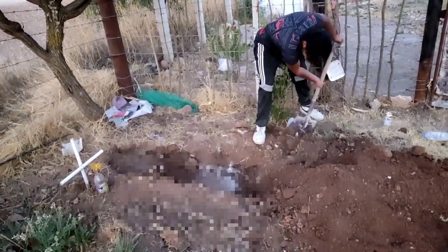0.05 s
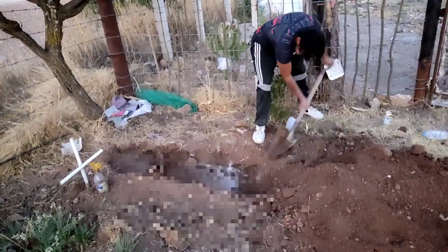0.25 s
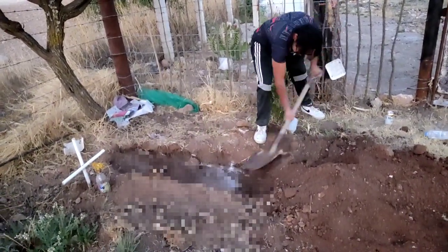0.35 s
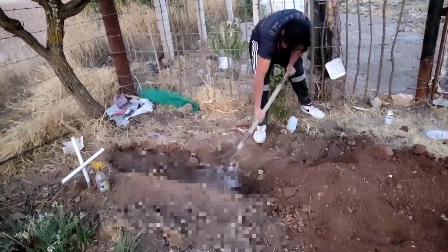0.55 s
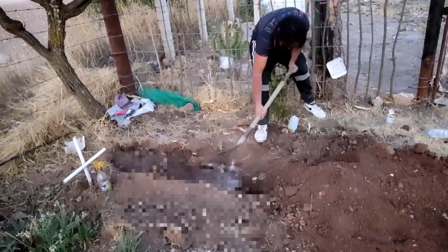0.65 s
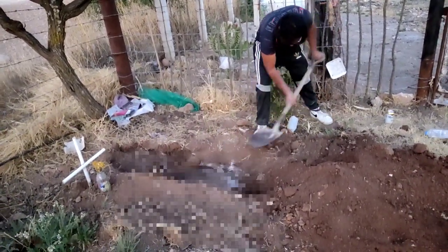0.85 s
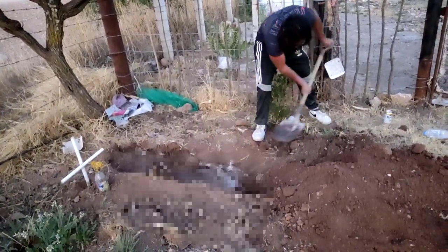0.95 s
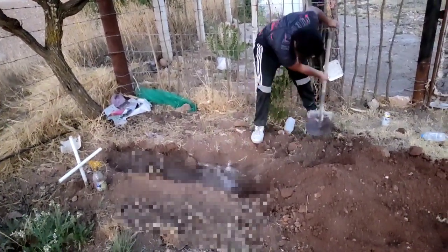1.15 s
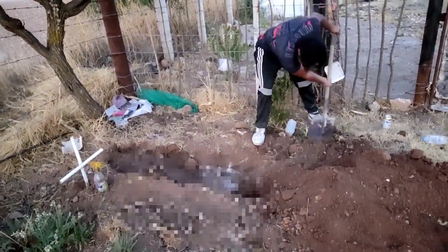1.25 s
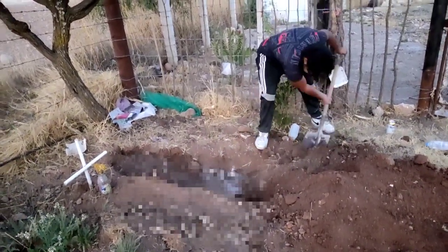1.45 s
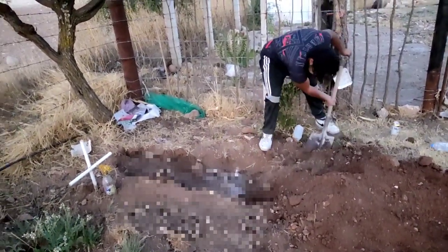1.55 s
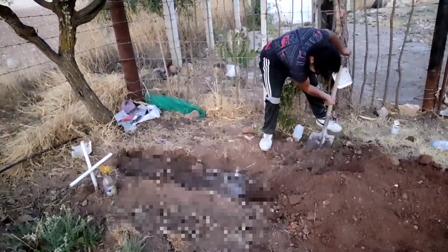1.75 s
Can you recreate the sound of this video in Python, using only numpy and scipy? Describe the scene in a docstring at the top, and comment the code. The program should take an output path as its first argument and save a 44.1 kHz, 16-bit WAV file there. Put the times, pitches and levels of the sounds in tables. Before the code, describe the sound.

Outdoors, a few metres away, dry soil and stones rush off a metal shovel with a bright clank, sparse crumbs fall, a pause, then a duller gritty stab into earth; faint hush and low wind puffs on a stereo phone.

```python
"""Outdoors, a few metres from a steel shovel: stony soil slides off the blade as it is thrown, patters down,
then the blade bites into the heap again with a thud. Grit is grainy noise that hisses and sings high steel modes;
stones and the stab are short noise bursts that also ring the blade. Low noise with single puffs buffets the two
microphone ports of a phone, each with its own colour, over a faint country hush of coloured noise."""
import sys
import numpy as np
from scipy import signal
from scipy.fft import rfft, irfft
from scipy.io import wavfile
from scipy.ndimage import uniform_filter1d, map_coordinates

SR = 44100
rng = np.random.default_rng(int(sys.argv[2]) if len(sys.argv) > 2 else 0)


def to_wav(s):
    """Save 16-bit WAV."""
    ch = np.atleast_2d(s).T  # columns
    pcm = np.round(np.clip(ch, -1, 1) * 32767)  # PCM
    wavfile.write(sys.argv[1], SR, pcm.astype(np.int16))


N = 77175
T = np.arange(N) / SR  # seconds
SIDE = np.array([[.5], [-.5]])  # splits a left minus right difference between the two ports
FILTER_SIZE = 2 ** 13  # samples


def undb(db):
    """Decibels to amplitude."""
    return 10 ** (np.asarray(db) / 20)


def unit(x):
    """Scale to an RMS of one."""
    return x / np.sqrt(np.mean(x ** 2))


def curve(table):
    """Columns of a table joined by straight lines in time."""
    rows = np.array(table, float)
    return [np.interp(T, rows[:, 0], column) for column in rows[:, 1:].T]


def along(table, hz):
    """A (Hz, value) table read on a log-frequency axis."""
    rows = np.array(table, float)
    return np.interp(np.log(hz + 1), np.log(rows[:, 0] + 1), rows[:, 1])


def decay(age, t60):
    """Exponential fade that falls 60 dB in t60 seconds."""
    return 1000. ** (-age / t60)


def convolve(x, response):
    """Pass each row of x through one impulse response."""
    return signal.fftconvolve(x, response, axes=1)[:, :N]


def colour(x, gain_db):
    """Causal minimum-phase filter from a dB curve, built by folding its cepstrum."""
    db = gain_db(np.fft.rfftfreq(FILTER_SIZE, 1 / SR))
    cepstrum = irfft(db * np.log(10) / 20)
    cepstrum[1:FILTER_SIZE // 2] *= 2
    cepstrum[FILTER_SIZE // 2 + 1:] = 0
    return convolve(x, irfft(np.exp(rfft(cepstrum)))[None])


def shape(x, table):
    """Colour by a spectrum that falls away steeply outside its ends, at unit gain for noise."""
    low, high = table[0][0], table[-1][0]

    def gain_db(hz):
        below = 70 * np.log10(np.maximum(low / (hz + 1), 1))
        above = 40 * (hz > high)
        return along(table, hz) - below - above

    hz = np.fft.rfftfreq(FILTER_SIZE, 1 / SR)
    return colour(x, gain_db) / np.sqrt(np.mean(undb(gain_db(hz)) ** 2))


# Colour difference between the ports: peaks and dips. Each row: frequency in Hz, left minus right in dB.
PORT_COLOUR = [(200, -1.5), (700, -0.5), (1270, 2), (2340, 9.5), (4310, -1), (6500, -1), (8000, -2.5),
               (9000, -7.5), (10300, 11.5), (12000, 9.5), (14600, 11)]
# Delay of the right port. Each row: time in seconds, lag in seconds.
PORT_LAG = [(0, 0.000086), (.5, 0.000033), (.8, 0.0000091), (1.3, .00012), (1.75, 0.000099)]
# How unlike the two ports sound. Each row: frequency in Hz, share of the power that they do not have in common.
PORT_APART = [(200, .15), (800, .15), (2000, .3), (6000, .4), (14000, .55)]


def ports(streams):
    """Two spaced ports hear a shared stream plus one each, the right a little late, each with its colour."""
    shared = colour(streams[:1], lambda hz: 10 * np.log10(1 - along(PORT_APART, hz)))[0]
    left, right = shared + colour(streams[1:], lambda hz: 10 * np.log10(along(PORT_APART, hz)))
    right = map_coordinates(right, [(T - curve(PORT_LAG)[0]) * SR], mode="mirror")
    return np.vstack([colour(left[None], lambda hz: along(PORT_COLOUR, hz) / 2),
                      colour(right[None], lambda hz: -along(PORT_COLOUR, hz) / 2)])


# Spectrum of the country hush. Each row: frequency in Hz, density in dB per Hz (relative).
HUSH_COLOUR = [(120, -46.5), (200, -27), (344, -13.5), (397, -15), (833, -24), (963, -28), (2020, -29),
               (2250, -26.5), (3290, -31), (3800, -29.5), (10600, -35), (15000, -42)]
# Level of the hush over time. Each row: time in seconds, level in dB above HUSH_DB.
HUSH_LEVEL = [(0, 12.5), (.35, 4), (.55, -0.5), (.72, 1), (.82, 4.5), (1.1, 4), (1.3, 3.5), (1.75, 6)]
HUSH_DB = -61.5


def country_hush():
    """Faint noise, mostly low mids, whose level sinks and partly returns."""
    air = ports(shape(rng.standard_normal((3, N)), HUSH_COLOUR))
    return undb(HUSH_DB + curve(HUSH_LEVEL)[0]) * air


BUFFET_DB, BUFFETS_PER_S = 3.5, 20


def buffeting():
    """Random wind levels, each held for one buffet and slewed into the next; spread near 1."""
    hold = int(SR / BUFFETS_PER_S)
    steps = np.repeat(rng.standard_normal(N), hold)[:N]
    return unit(uniform_filter1d(steps, hold))


# Wind on the ports. Each row: time in seconds, level in dB, left minus right in dB (held within 14 either way).
WIND_LEVEL = [(0.0, -33, 13.5), (0.048, -37, 11.5), (0.082, -33, 14), (0.12, -32, 19), (0.146, -45, -1),
              (0.198, -44, 1), (0.272, -52, -24), (0.438, -51, 0), (0.496, -34, -17), (0.53, -45, -3),
              (0.598, -35, -25), (0.628, -51.5, -17), (0.73, -45.5, -1), (0.77, -47, -7), (0.944, -55, 4),
              (1.008, -49.5, 7), (1.038, -51, -6.5), (1.194, -53, 9.5), (1.218, -49.5, 3), (1.306, -56, -4),
              (1.33, -49.5, 9), (1.466, -52, -6), (1.516, -39, 13), (1.646, -37.5, 11.5), (1.706, -40, 7),
              (1.75, -41.5, -28)]
# Spectrum of the wind. Each row: frequency in Hz, density in dB per Hz (relative).
WIND_COLOUR = [(12, -12), (20, 8.5), (91, 1), (134, -5.5), (240, -13.5), (544, -44.5), (700, -37),
               (910, -70), (1540, -120)]
# Single puffs. Each row: centre in seconds, peak in dB, port (0 left, 1 right), length in seconds
# (the crests lie a quarter of it either side of the centre), 1 pulls then pushes or -1 the reverse.
PUFFS = [(.04, -24, 0, .009, 1), (0.1155, -19, 0, 0.013, 1), (.5035, -21.5, 1, 0.0051, -1),
         (1.525, -32, 0, 0.0078, 1)]


def wind():
    """Turbulence at each port makes unrelated low buffeting, with a few single pressure puffs."""
    level_db, pan_db = curve(WIND_LEVEL)
    gusts = np.array([buffeting(), buffeting()])
    out = shape(rng.standard_normal((2, N)), WIND_COLOUR) * unit(undb(BUFFET_DB * gusts))
    out = out * undb(level_db + SIDE * np.clip(pan_db, -14, 14))
    for centre, peak_db, port, length, way in PUFFS:
        u = (T - centre) / length * 4
        out[port] += way * undb(peak_db) * u * np.exp(.5 - u ** 2 / 2)
    return out


GRAIN_S, GRAIN_DB = .0004, 1.2  # one grain's hold time; dB per unit of its random size
CLODS_PER_S, CLOD_DB, CRUNCH_S = 140, 5, .004  # crunch power dies by 1/e in CRUNCH_S


def grains():
    """Three streams of grit (one shared, one for each port): uneven grains, clods that crunch and die away."""
    hold = int(GRAIN_S * SR)
    sizes = np.repeat(rng.exponential(1, N).clip(0, 4), hold)[:N]
    clods = (rng.random(N) < CLODS_PER_S / SR) * rng.random(N) * undb(CLOD_DB) ** 2
    crunch = signal.lfilter([1], [1, -np.exp(-1 / (CRUNCH_S * SR))], clods)
    return unit(undb(GRAIN_DB * sizes) * np.sqrt(1 + crunch)) * rng.standard_normal((3, N))


PAIR_SPLIT = .005  # largest gap within a pair, as a share of its frequency


def modes(table, damp, weight=lambda hz: 1):
    """Ring of a set of modes, each a beating pair; shorter when soil holds the steel; unit gain for noise."""
    ring, t = 0, T[:SR // 2]
    for hz, db, t60 in table:
        pair = hz * (1 + PAIR_SPLIT * (rng.random() - .5) * np.array([[0], [2]]))
        beating = np.sin(2 * np.pi * pair * t).sum(axis=0)
        ring = ring + weight(hz) * undb(db) * beating * decay(t, t60 * damp)
    return ring[None] / np.sqrt(np.sum(ring ** 2))


# Main modes of the steel blade. Each row: frequency in Hz, level in dB, free t60 in seconds.
BLADE_MODES = [(1152, -9, .3), (1400, -9, .08), (1453, 0, .42), (1500, -1, .14), (1650, -7, .07),
               (1960, 0, .1), (2150, -5, .08), (2270, -4, .1), (2400, -4, .07), (2540, -5, .09),
               (2745, -3, .12), (2853, -5, .14), (3095, -2, .08), (3354, -1, .14), (3550, -2, .09),
               (3860, -5, .07), (4050, -4, .12), (4194, -4, .1), (4404, -5, .1), (4613, -5, .08),
               (4980, -5, .08), (5400, -7, .07)]


def blade(x, damp, centre_hz, octaves):
    """The steel blade rings at the modes favoured by where it is struck."""
    def place(hz):
        return np.exp(-(np.log2(hz / centre_hz) / octaves) ** 2 / 2)

    return convolve(x, modes(BLADE_MODES, damp, place))


# High modes of the blade. Each row: frequency in Hz, level in dB, free t60 in seconds.
SHEEN_MODES = [(6240, -10, .06), (7810, -10, .05), (8300, -7, .06), (8650, -4, .08), (8780, -3, .07),
               (8990, -4, .07), (9320, 0, .08), (10070, -4, .07), (10370, -3, .07), (10600, -5, .07),
               (10850, -4, .07), (11700, -4, .05)]


def sheen(soil, damp):
    """Grit and knocks excite the high modes of the blade into a bright sheen."""
    return convolve(soil, modes(SHEEN_MODES, damp))


# Stones and clods striking, and the blade stabbing the heap near 1.29 s. Each row: start in seconds,
# level in dB (nominal peak), share that rings the blade in dB, left minus right in dB, t60 in seconds,
# rise time constant in seconds.
KNOCKS = [(0.0714, -29, -13, 3, 0.056, 0.0014), (0.206, -18.5, -18, -4.5, 0.06, 0.0026),
          (0.2228, -16.5, -23, 10, 0.033, .002), (0.2569, -6, -4.5, -0.5, 0.04, 0.00036),
          (0.305, -9.5, -4.5, -5, 0.029, 0.0021), (0.325, -5, -15, -7.5, 0.045, 0.0022),
          (0.3446, -9, -18.5, 0, 0.033, .001), (.478, -36.5, -18, 13, .05, .004),
          (0.517, -27.5, -12.5, 0, 0.1, 0.0021), (0.6045, -25.5, -30, 12, 0.011, 0.00043),
          (0.622, -18.5, -21, -0.5, 0.057, 0.0013), (0.6522, -25.5, -8, -5, 0.075, 0.00049),
          (0.668, -22, -9.5, 1, 0.053, 0.0011), (0.6885, -29, -26, 7, 0.1, 0.00081),
          (1.291, -15, -6, 0, 0.082, 0.0057), (1.3, -22, 4, 0, 0.039, 0.0023),
          (1.3599, -9, -20.5, 2, 0.097, 0.00054), (1.4249, -8, -36, 2.5, 0.055, 0.0018),
          (1.456, -14, -20, 6, 0.042, 0.0017), (1.465, -14, -17, 1, .02, .002),
          (1.48, -29, -25, -7, .02, 0.00056), (1.5, -29, -28, -6, 0.014, 0.00067)]
CRACK_DB, CRACK_S = 0, .003  # opening crack over the body of the knock, and its time constant


def knocks(start, end):
    """Power of the knocks at each port and into the blade: a quick rise, a short crack, a longer fade."""
    hits, ring = np.zeros((2, N)), np.zeros(N)
    for s, peak_db, share_db, pan_db, t60, rise in KNOCKS:
        if start <= s < end:
            age = np.maximum(T - s, 0)
            crack = 1 + undb(CRACK_DB) * np.exp(-age / CRACK_S)
            envelope = (1 - np.exp(-age / rise)) * decay(age, t60) * crack
            power = (undb(peak_db) / 2 * envelope) ** 2
            hits += power * undb(SIDE * pan_db) ** 2
            ring += power * undb(share_db) ** 2
    return hits, ring


def move(slide, grit, strike):
    """One move of the shovel: sliding grit and knocks hiss and ring the blade."""
    start, end = slide[0][0], slide[-1][0]
    damp, centre_hz, octaves, sheen_db = strike
    level_db, pan_db, share_db = curve(slide)
    # soft edges to the move
    on = uniform_filter1d(1. * (T >= start) * (T <= end), size=400, mode="nearest").clip(0)
    # powers, so that grit and knocks add
    hiss = on * undb(level_db + SIDE * pan_db) ** 2 + 1e-12
    hits, hit_ring = knocks(start, end)
    ring = on * undb(level_db + share_db) ** 2 + hit_ring

    sliding = grains() * np.sqrt(hiss.mean(axis=0))
    striking = rng.standard_normal((3, N)) * np.sqrt(hits.mean(axis=0))
    soil = sliding + striking
    pan = np.sqrt((hiss + hits) / np.mean(hiss + hits, axis=0))
    steel = blade(grains() * np.sqrt(ring), damp, centre_hz, octaves)
    bright_soil = shape(soil, grit) + undb(sheen_db) * sheen(soil, damp)
    heard = ports(bright_soil) * pan + ports(steel)
    # roll off below the lowest frequency of the grit
    return signal.sosfilt(signal.butter(4, grit[0][0], "high", fs=SR, output="sos"), heard)


# Sliding soil, one list per move: the throw, the last soil falling, the next dig.
# Each row: time in seconds, level in dB, left minus right in dB, share that rings the blade in dB.
SLIDES = [
    [(0, -52.5, 5, -4), (.068, -57, 6, -29), (.11, -56.5, 6, -5), (.165, -40.5, 3.5, -12),
     (.2, -40.5, 9, -7.5), (.232, -22, 6.5, -17.5), (.252, -32.5, -7, -13), (.265, -24, 3, -2),
     (.29, -23.5, -5, -10.5), (.308, -16, -0.5, -6), (.335, -17, -5, -8), (.36, -21.5, -1, -15.5),
     (.408, -27.5, -2, -13), (.432, -43, -1.5, -8), (.46, -50.5, 15, -7)],
    [(.46, -51, -2, -14), (.484, -44.5, -0.5, -19), (.505, -49, 0, -13), (.56, -49.5, 3.5, -8.5),
     (.618, -38, -0.5, -17), (.645, -41.5, 11, -9), (.672, -37.5, 3, -16), (.71, -40, 1.5, -10),
     (.736, -48, 2, -10.5), (.8, -59, 7, -25), (.888, -49.5, 3.5, -13), (1.1, -70.5, -5.5, -13)],
    [(1.285, -66, 3, -1), (1.302, -24.5, 1, -5.5), (1.342, -37.5, 5.5, -8), (1.356, -31.5, 8, -9),
     (1.38, -20, 1.5, -24), (1.42, -24.5, 2, -19.5), (1.446, -25.5, -0.5, -17.5), (1.466, -21, -2, -20.5),
     (1.478, -30.5, 1.5, -11), (1.504, -32, 1.5, -22.5), (1.57, -53.5, -0.5, -16), (1.66, -52.5, 4, -9.5),
     (1.75, -56, -3, -12)],
]
# Colour of the grit in each move. Each row: frequency in Hz, density in dB per Hz (relative).
GRIT_THROW = [(560, -24), (700, -35), (1270, -22), (3000, -18), (5000, -15), (6700, -13), (9030, -0.5),
              (11500, -4.5), (13800, -12), (15000, -54)]
GRIT_FALL = [(1600, -33), (2250, -21), (4900, -11), (6190, -18), (7500, -3.5), (11200, 3.5), (14000, -12.5),
             (15000, -52)]
GRIT_DIG = [(140, -17.5), (800, -22.5), (1670, -21), (2650, -13), (3540, -9), (4500, -15.5), (7000, -9),
            (11000, -1), (14000, -10), (15000, -55)]
# The blade, one row per move. Each row: share of the free ring time, centre of the favoured modes in Hz,
# their width in octaves, level of the high modes in dB.
STRIKES = [(1, 2600, 1.3, -5), (.7, 2600, 0.4, -8), (0.45, 1960, .2, -12)]


def soil_moves():
    """Soil slides and stones knock through the throw, the fall and the next dig."""
    grits = (GRIT_THROW, GRIT_FALL, GRIT_DIG)
    return sum(move(slide, grit, strike) for slide, grit, strike in zip(SLIDES, grits, STRIKES))


# Pass band of the thud: low edge, high edge in Hz.
THUD_BAND = (150, 1100)
THUD_S, THUD_DB, THUD_T60_S, THUD_RISE_S = 1.292, -33, .1, .0032


def heap_thud():
    """The heap thuds as the edge goes in: a low noise burst, alike at both ports."""
    age = np.maximum(T - THUD_S, 0)
    band = signal.butter(2, THUD_BAND, "band", fs=SR, output="sos")
    body = unit(signal.sosfilt(band, rng.standard_normal(N)))
    return undb(THUD_DB) * body * (1 - np.exp(-age / THUD_RISE_S)) * decay(age, THUD_T60_S)


def scene():
    """Hush, wind, the three moves of soil and the thud of the heap together."""
    return country_hush() + wind() + soil_moves() + heap_thud()


def record(dry):
    """The phone rounds the loudest peaks and cuts the top."""
    rounded = 1.3 * np.tanh(dry / 1.3)
    # low-pass at 14500 Hz: 0.2 dB ripple, 55 dB down above
    return signal.sosfilt(signal.ellip(8, .2, 55, 14500, fs=SR, output="sos"), rounded)


dry = scene()
out = record(dry)
to_wav(out)
```